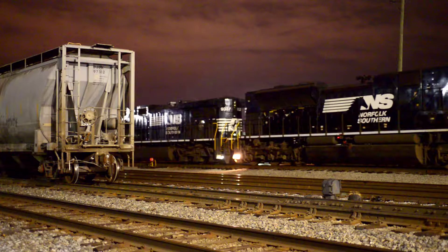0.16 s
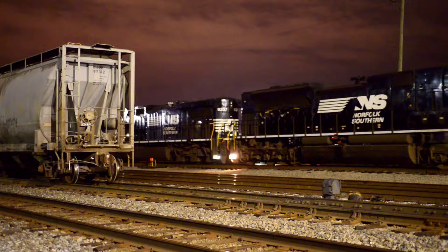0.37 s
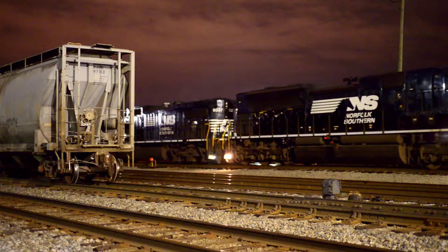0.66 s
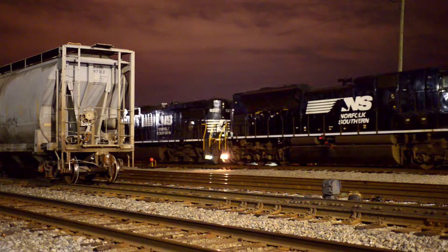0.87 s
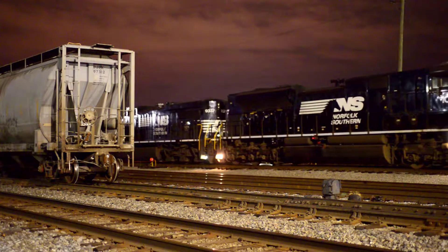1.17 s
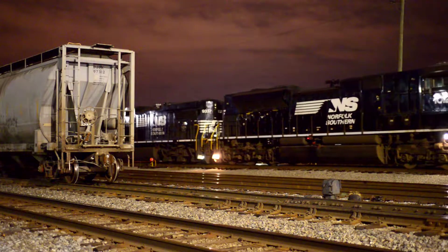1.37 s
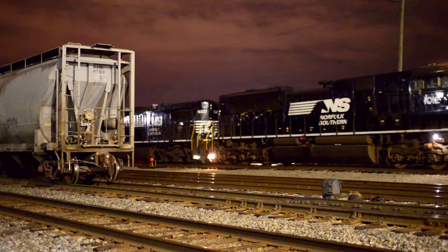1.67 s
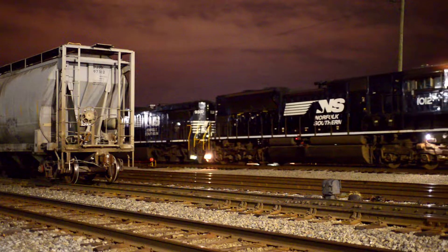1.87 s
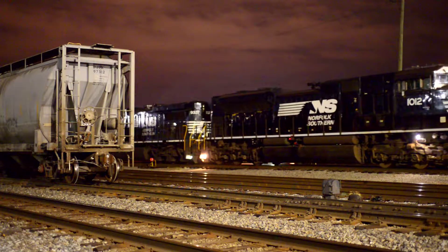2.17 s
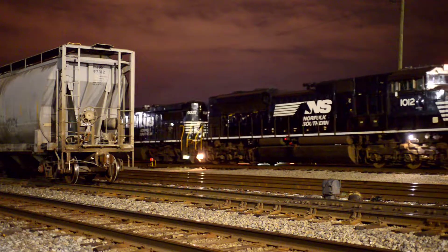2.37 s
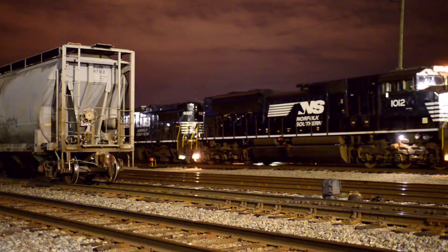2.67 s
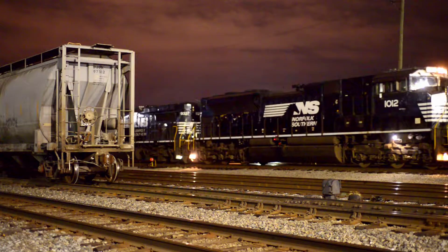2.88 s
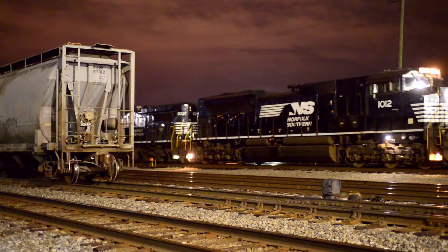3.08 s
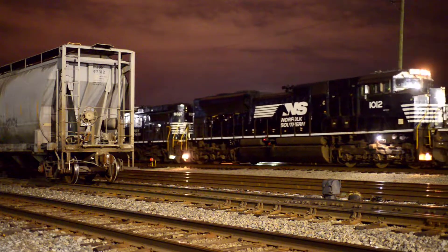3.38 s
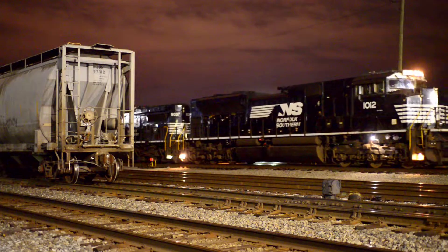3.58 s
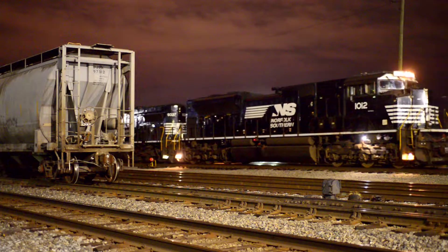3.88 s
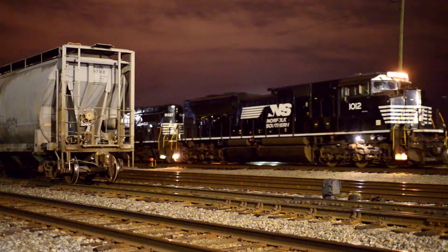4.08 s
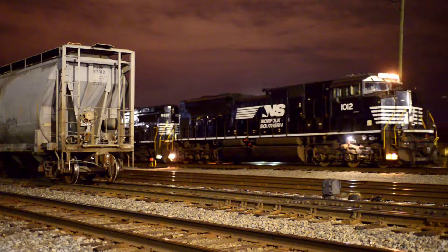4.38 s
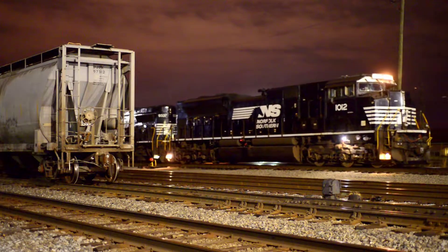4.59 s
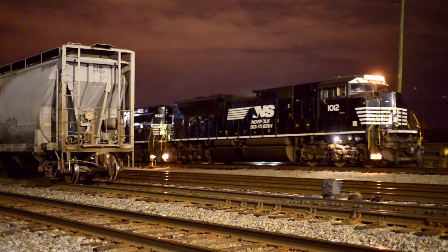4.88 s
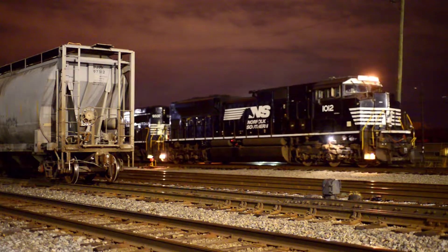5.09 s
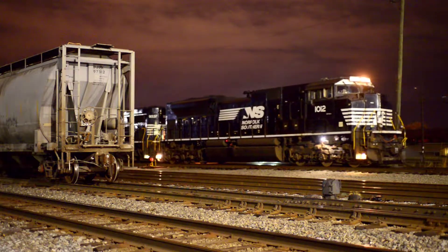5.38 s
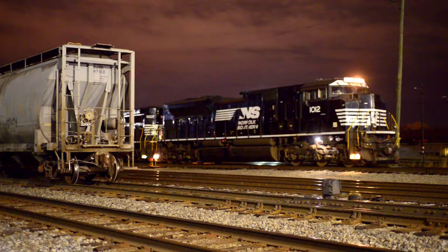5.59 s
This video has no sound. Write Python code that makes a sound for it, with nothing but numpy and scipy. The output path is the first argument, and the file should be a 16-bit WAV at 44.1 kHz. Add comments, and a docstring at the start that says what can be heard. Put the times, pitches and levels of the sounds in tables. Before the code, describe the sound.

Two diesel locomotives creep through a rail yard, and their loud, deep throb runs from start to finish. The exhaust pulses unevenly over a low rumble, with engine clatter, hiss, a thin warbling turbocharger whistle and faint gear tones that swell and fade. The engine pitch lifts a little in the first second, sags until about 3 seconds, then climbs gently toward the end. A few light steel ticks come in the first two seconds. From about 2.8 seconds loose fittings clink more often, ringing briefly near 3, 4.2 and 5.2 seconds. The wheels grind on the rail from around 3 seconds, with short, sharper scrapes, the strongest near 4.5 seconds. The second engine's low hum swells slightly around 4 seconds. At about 5 seconds an air valve gives one short spit, and the engines throb on until nearly 6 seconds.

```python
"""First you hear the deep throb of two diesel locomotives creeping through a rail yard.
Uneven firings pulse in the exhaust while the governed engine speed drifts slowly up and down.
The engine block clatters, a turbocharger whistles, gears sing and loose steel fittings clink.
Later the wheel rims grind on the rail, and near the end an air valve spits once."""
import sys
import numpy as np
from scipy import signal
from scipy.fft import rfft, irfft, next_fast_len
from scipy.io import wavfile
from scipy.ndimage import uniform_filter1d

SR = 44100
rng = np.random.default_rng(int(sys.argv[2]) if len(sys.argv) > 2 else 0)


def to_wav(s):
    """Save 16-bit WAV."""
    ch = np.atleast_2d(s).T  # columns
    pcm = np.round(np.clip(ch, -1, 1) * 32767)  # PCM
    wavfile.write(sys.argv[1], SR, pcm.astype(np.int16))


N = 253034
T = np.arange(N) / SR

# Speed of the leading engine. Each row: time in seconds, firings per second.
FIRING_RATE = [(0, 51.95), (.362, 53.4), (.762, 53.88), (1.762, 53.06), (2.562, 51.74), (3.262, 50.9),
               (4.162, 51.77), (4.862, 53.93), (5.74, 57.42)]
# One engine cycle. Each row: when a cylinder fires, counted in firing intervals, strength in dB.
CYLINDERS = [(.79, -6.1), (1.48, -1.9), (2.7, -3.1), (3.82, -.1), (4.59, 3.5), (5.64, .2), (6.47, -.3),
             (7.58, .7)]
# The engine hoods slide by. Each row: time in seconds, then relative levels in dB of
# rumble, exhaust roar, block rattle and hiss.
PASSING_LEVELS = [(0.0, -34, -28.5, -34, -34.5), (0.6, -34.5, -28.5, -36, -36), (1.4, -37.5, -30, -38, -39),
                  (2.1, -32, -29, -35.5, -36), (3.3, -32, -28, -35.5, -35), (4.2, -33, -30, -36, -34.5),
                  (4.85, -32.5, -31.5, -40, -34), (5.74, -33, -31.5, -37, -34.5)]
# Tone colours of the exhaust stack and those four noises. Each row: frequency in Hz, gain in dB.
STACK_COLOUR = [(20, -38.8), (38, -28.8), (46, -2.6), (54, 6), (62, 2.8), (70, -6.3), (80, -13), (110, -13),
                (160, -24), (250, -43), (400, -37.5), (900, -69)]
RUMBLE_COLOUR = [(15, -29), (35, -38.5), (60, -13.5), (85, 6), (125, 3), (190, -1.5), (270, -6.5),
                 (350, -10), (600, -40)]
ROAR_COLOUR = [(250, -10.5), (350, -13), (420, -3.5), (510, -0.5), (560, -3), (610, 2.5), (670, 1),
               (740, -2), (900, -9.5), (1100, -11), (1800, -25.5)]
BLOCK_COLOUR = [(600, -22), (950, -4), (1250, 0), (1550, 0.5), (1780, -2.5), (2100, -5), (2600, -19.5),
                (4000, -27)]
HISS_COLOUR = [(1500, -23), (2300, 0), (2700, 0.5), (3250, 2), (3650, -2), (4200, -6), (4900, -12),
               (5700, -13), (7000, -19), (9000, -24.5), (11000, -32.5), (13000, -42), (15500, -45)]
# Exhaust notes of the trailing engine. Each row: multiple of its cycle rate, relative level in dB.
TRAILING_NOTES = [(11, -50), (13, -31.5), (14, -39.5), (15, -30.5), (16, -37), (17, -37), (18, -31.5),
                  (19, -40), (20, -30.5), (21, -41), (22, -49), (24, -39), (27, -63), (32, -38),
                  (39, -44.5)]
# Turbocharger whistle. Each row: time in seconds, level in dB.
WHISTLE_LEVELS = [(0, -51), (.35, -45.5), (.9, -45), (1.2, -46.5), (1.45, -44), (1.7, -48), (1.95, -43),
                  (2.45, -44.5), (2.7, -47.5), (3.4, -47.5), (3.8, -47.5), (4.5, -45.5), (4.87, -51.5),
                  (5.3, -46.5), (5.74, -45)]
# Gear tones. Each row: multiple of the cycle rate, peak time and spread in seconds, level in dB.
GEAR_TONES = [(68, .4, .9, -43), (375, .58, .3, -46), (441, .75, .35, -41), (159, 1.1, .9, -41),
              (375, 1.33, .38, -45), (441, 1.8, .55, -44), (92, 2.0, .45, -36.5), (104, 2.85, 1.0, -35),
              (441, 2.85, .45, -45), (441, 3.72, .2, -44), (441, 4.3, .45, -42), (375, 5.05, .35, -48),
              (441, 5.65, .4, -44), (375, 5.68, .22, -40.5)]
# Knocks of loose fittings. Each row: start in seconds, relative tick and ring levels in dB.
CLINKS = [(.072, -40, -70), (.356, -45, -70), (.57, -50, -58), (1.822, -36, -69), (2.79, -41, -70),
          (2.876, -38, -66), (2.92, -33, -66), (3.042, -32, -39), (3.075, -37, -52), (3.125, -35, -64),
          (3.423, -40, -70), (3.56, -37, -60), (3.61, -42, -62), (3.758, -33, -52), (4.047, -43, -70),
          (4.153, -33, -41), (4.185, -36, -50), (4.254, -47, -66), (4.38, -41, -66), (4.528, -34, -68),
          (4.656, -41, -70), (4.683, -42, -56), (4.78, -38, -67), (4.858, -39, -62), (5.203, -38, -43),
          (5.564, -40, -70), (5.633, -36, -66)]
# How the fittings ring. Each row: pitch in Hz, relative level in dB, seconds to fade by 60 dB.
STEEL_NOTES = [(3355, 13, .22), (4177, 13, .2), (4435, 9, .18), (6455, 2, .22), (7310, -1, .2),
               (7925, -2, .16), (9650, -5, .16), (9970, -5, .16), (10790, -4, .22), (12230, -9, .14),
               (12710, -5, .22), (13600, -9, .14)]
# The dry tick of steel on steel. Each row: frequency in Hz, gain in dB.
TICK_COLOUR = [(1200, -5), (2800, -2), (4200, 7), (5500, -4), (8500, -6.5), (11000, -23), (15500, -31)]
# The low and high note of a rubbed wheel. Each row: pitch in Hz, width in Hz.
WHEEL_NOTES = [(1690, 230), (3280, 290)]
# Grinding on those two notes. Each row: peak time and spread in seconds, level in dB.
GRINDS = [(4.6, 1, -39.5), (3.62, 1, -41.5)]
# Sharper scrapes. Each row: peak time and spread in seconds, low and high note levels in dB.
SCRAPES = [(3.15, 0.038, -34, -35), (3.284, 0.019, -31.5, -40), (3.347, 0.01, -45, -33),
           (3.433, 0.0092, -51, -36), (3.77, 0.034, -36, -31.5), (4.17, 0.049, -38, -34),
           (4.39, 0.057, -34, -46), (4.529, .027, -26.5, -35), (5.186, 0.012, -40, -31)]
# Escaping air. Each row: frequency in Hz, gain in dB.
SPIT_COLOUR = [(1200, -9), (2200, 3), (3600, 3.5), (5000, -6), (7500, -9), (10000, -12.5), (12500, -15.5),
               (15500, -22)]


def undb(db):
    """Turn decibels into a gain."""
    return 10 ** (np.asarray(db) / 20)


def unit(x):
    """Scale a signal to an average (rms) level of 1."""
    return x / np.sqrt(np.mean(x ** 2))


def curve(table, column=1):
    """Follow one column of a time table along straight lines."""
    rows = np.array(table)
    return np.interp(T, rows[:, 0], rows[:, column])


def swell(at, spread):
    """A bell-shaped rise and fall, 1 at its top."""
    return np.exp(-((T - at) / spread) ** 2)


def noise():
    """White noise."""
    return rng.standard_normal(N)


def drift(rate):
    """A random wander of level 1 that changes course about rate times a second."""
    step = int(SR / rate)
    stairs = np.repeat(rng.standard_normal(N // step + 1), step)
    return unit(uniform_filter1d(stairs, step)[:N])


def colour(x, points):
    """Filter a signal to a tone colour; the result has level 1."""
    size = next_fast_len(N + SR // 2) * 2
    hz, db = np.transpose(points)
    freqs = np.maximum(np.arange(size // 2 + 1) * SR / size, 1)
    gain = undb(np.interp(np.log(freqs), np.log(hz), db, right=db.min() - 29))
    # make the filter ring only after a sound, never before it
    cepstrum = irfft(np.log(gain))
    cepstrum[1:size // 2] *= 2
    cepstrum[size // 2 + 1:] = 0
    return unit(irfft(rfft(x, size) * np.exp(rfft(cepstrum)))[:len(x)])


def band(hz, width_hz):
    """Noise gathered around one frequency, at level 1."""
    freqs = np.arange(N // 2 + 1) * SR / N
    return unit(irfft(rfft(noise()) / (1 + ((freqs - hz) / width_hz) ** 2), N))


def firings(cycles, scatter_db, jitter):
    """One pulse per firing, each cylinder with its own moment and strength. Starts a second early."""
    moment, db = np.transpose(CYLINDERS)
    starts = np.arange(-2, int(cycles[-1]) + 1)[:, None]
    chance = rng.standard_normal((len(starts), 2, len(db)))
    when = (starts + (moment + jitter * chance[:, 0]) / len(db)).ravel()
    strength = undb(db + scatter_db * chance[:, 1]).ravel()
    lead_in = cycles[0] + (cycles[1] - cycles[0]) * np.arange(-SR, 0)
    pulses = np.zeros(SR + N + 1)
    np.add.at(pulses, np.searchsorted(np.r_[lead_in, cycles], when), strength)
    return pulses[:-1]


def gas_flow(pulses, decay_s):
    """Gas rushes out after every firing and dies away; its average is 1."""
    flow = signal.lfilter([1], [1, -np.exp(-1 / (SR * decay_s))], pulses)[SR:]
    return flow / flow.mean()


def clatter(cycles, repeat):
    """A dense rattle; repeat is the share that comes back with every engine cycle."""
    size = int(N / cycles[-1])
    pattern = rng.standard_normal(size)[(cycles % 1 * size).astype(int)]
    return np.sqrt(repeat) * pattern + np.sqrt(1 - repeat) * noise()


def leading_engine(cycles, pulses):
    """Firings boom in the exhaust stack and pump the rumble, roar, block rattle and hiss."""
    flow = gas_flow(pulses, decay_s=0.02)
    boom = colour(pulses, STACK_COLOUR)[SR:] * undb(-12)
    rumble = colour(clatter(cycles, repeat=0.27) * flow ** 0.65, RUMBLE_COLOUR)
    rumble *= undb(curve(PASSING_LEVELS, column=1) + 4.5)
    roar = colour(clatter(cycles, repeat=0.55) * flow ** 0.27, ROAR_COLOUR)
    roar *= undb(curve(PASSING_LEVELS, column=2) + 0.73)
    block = colour(clatter(cycles, repeat=0.12) * flow ** 0.21, BLOCK_COLOUR)
    block *= undb(curve(PASSING_LEVELS, column=3) + 1.35 + 0.24 * drift(30))
    hiss = colour(noise() * flow ** 0.32, HISS_COLOUR)  # from gears and rolling
    hiss *= undb(curve(PASSING_LEVELS, column=4) - 0.8 + drift(40) / 2)
    return boom + rumble + roar + block + hiss


def trailing_engine(cycles, flutter_db, swell_db, nearest_s):
    """Only the low exhaust notes of the second engine carry; they swell as it passes the listener."""
    notes = 0
    for multiple, db in TRAILING_NOTES:
        level = undb(db + flutter_db * drift(3.04))
        notes += level * np.sin(2 * np.pi * (multiple * cycles + rng.random()))
    return notes * undb(swell_db * swell(nearest_s, 0.52))


def turbocharger(cycles, pulses, blur, overtone_db):
    """Blades whistle in step with the engine; every firing kicks the rotor, so the pitch warbles."""
    multiple, warble_hz, wander_hz, width_hz = 910, 75, 14, 100  # each tone scales these by its ratio
    kick = np.cos(2 * np.pi * len(CYLINDERS) * cycles) * (1 + .3 * drift(30))
    bend = np.cumsum(warble_hz * kick + wander_hz * drift(25)) / SR
    phase = 2 * np.pi * (multiple * cycles + bend)
    whistle = 0
    for ratio, db in ((0.99, 0), (1.97, overtone_db)):
        # slow noise smears the pure tone
        tone = (1 + blur * band(0, ratio * width_hz)) * np.cos(ratio * phase)
        tone += blur * band(0, ratio * width_hz) * np.sin(ratio * phase)
        whistle += undb(db) * tone
    throb = gas_flow(pulses, decay_s=0.011) ** 0.24
    return unit(whistle * throb) * undb(curve(WHISTLE_LEVELS))


def gears(cycles, wobble, flutter_db):
    """Gear teeth sing in step with the crankshaft; each tone swells and fades as the hoods move past."""
    tones = 0
    for multiple, at, spread, db in GEAR_TONES:
        tone = np.sqrt(2) * np.sin(2 * np.pi * multiple * cycles + wobble * drift(24))
        tones += tone * undb(db + flutter_db * drift(12)) * swell(at, spread)
    return tones


def loose_fittings(tick_s, tick_rise_s, ring_rise_s, ring_width_hz):
    """Loose steel knocks with a short dry tick; some blows also set up a buzzing ring."""
    ticks, rings = np.zeros(N), np.zeros(N)
    blur_step = np.sqrt(2 * np.pi * ring_width_hz / SR)
    for at, tick_db, ring_db in CLINKS:
        live = (T > at) & (T < at + .5)
        age = T[live] - at
        # scattering between the cars softens the start
        ticks[live] += undb(tick_db) * (1 - np.exp(-age / tick_rise_s)) * np.exp(-age / tick_s)
        onset = 1 - np.exp(-age / ring_rise_s)
        for hz, note_db, fade_s in STEEL_NOTES:
            # every blow favours other notes, and the loose contact blurs their pitch
            strength_db = ring_db + note_db - 5 + 2 * rng.standard_normal()
            blur = np.cumsum(rng.standard_normal(SR)[:len(age)]) * blur_step
            level = undb(strength_db - 60 * age / fade_s) * onset
            rings[live] += level * np.sin(2 * np.pi * hz * age + blur)
    return rings + ticks * colour(noise(), TICK_COLOUR)


def wheel_rims(chatter_db):
    """The lips of the wheels grind and scrape on the rail, so the wheels ring low and high."""
    ringing = 0
    for note, ((hz, width), (at, spread, db)) in enumerate(zip(WHEEL_NOTES, GRINDS)):
        grind = swell(at, spread) * undb(db + chatter_db * drift(45))
        scrapes = sum(swell(when, span) * undb(levels[note]) for when, span, *levels in SCRAPES)
        ringing += band(hz, width) * np.hypot(grind, scrapes)
    return ringing


def air_valve(start_s, rise_s, hold_s, level_db, echo_db, echo_s):
    """A short spit of compressed air that trails off between the cars."""
    age = T - start_s
    opening = np.clip(age / rise_s, 0, 1)
    closing_s = np.maximum(age - rise_s - hold_s, 0)
    jet = opening * undb(level_db - 190 * closing_s)  # falls 190 dB a second
    linger = np.exp(-1 / (SR * echo_s))
    echo = np.sqrt(signal.lfilter([1 - linger], [1, -linger], jet ** 2)) * undb(echo_db)
    return colour(noise(), SPIT_COLOUR) * np.hypot(jet, echo)


def scene():
    """Add up all the sounds; both engines follow one running count of engine cycles."""
    cycles = np.cumsum(curve(FIRING_RATE)) / SR / len(CYLINDERS)
    slower_cycles = .745 * cycles
    pulses = firings(cycles, scatter_db=1.3, jitter=0.012)
    mix = leading_engine(cycles, pulses)
    mix += trailing_engine(slower_cycles, flutter_db=5.5, swell_db=4.5, nearest_s=3.9)
    mix += turbocharger(cycles, pulses, blur=.75, overtone_db=-21.5)
    mix += gears(cycles, wobble=.45, flutter_db=2.2)
    mix += loose_fittings(tick_s=.014, tick_rise_s=.003, ring_rise_s=.018, ring_width_hz=70)
    mix += wheel_rims(chatter_db=3.0)
    mix += air_valve(start_s=4.968, rise_s=0.037, hold_s=0.09, level_db=-31, echo_db=-7.5, echo_s=0.053)
    return mix[None]


def record(dry):
    """Round off the biggest swings, fade in quickly and cut the highest treble."""
    ceiling, knee, fade_in_s, top_hz = .76, 5, .006, 15700
    rounded = dry / (1 + np.abs(dry / ceiling) ** knee) ** (1 / knee)
    fade_in = np.minimum(T / fade_in_s, 1)
    treble_cut = signal.ellip(10, .2, 80, top_hz, fs=SR, output="sos")
    return signal.sosfilt(treble_cut, rounded * fade_in)


dry = scene()
out = record(dry)
to_wav(out)
```